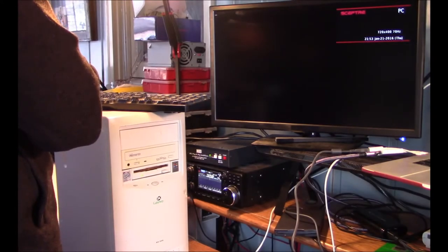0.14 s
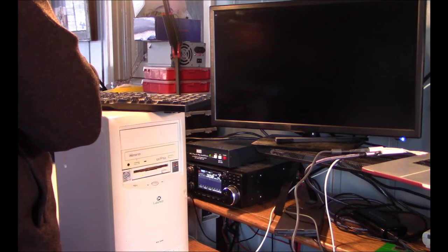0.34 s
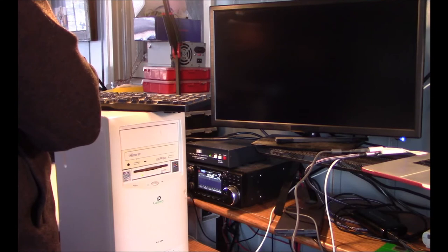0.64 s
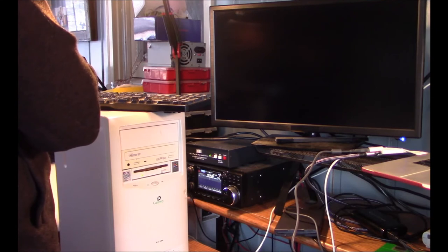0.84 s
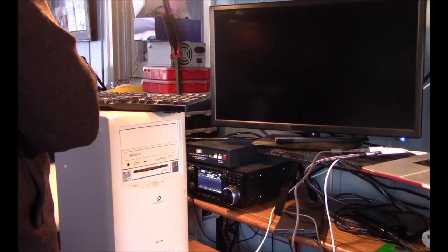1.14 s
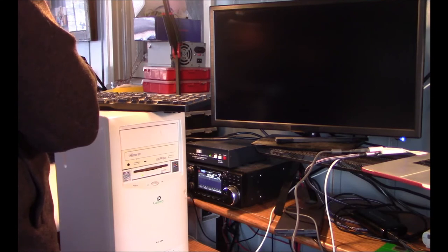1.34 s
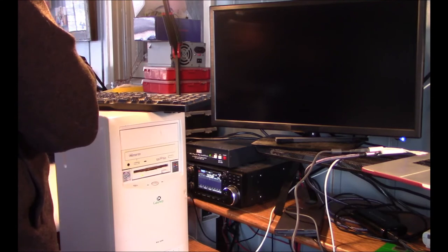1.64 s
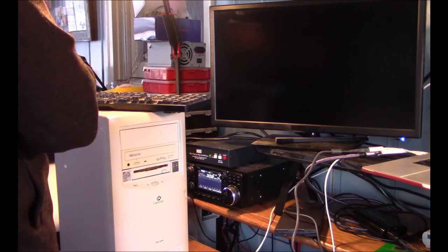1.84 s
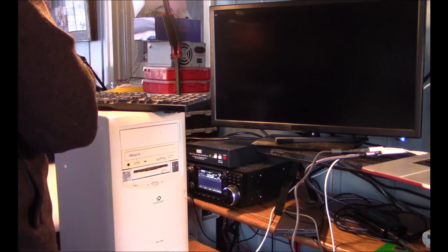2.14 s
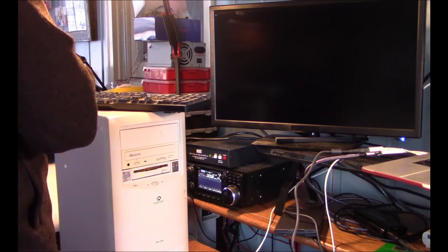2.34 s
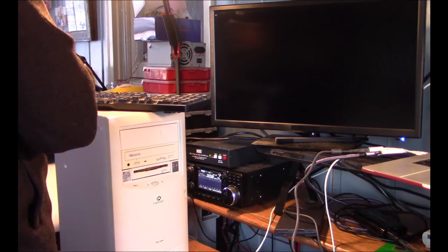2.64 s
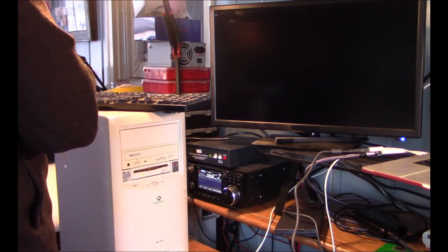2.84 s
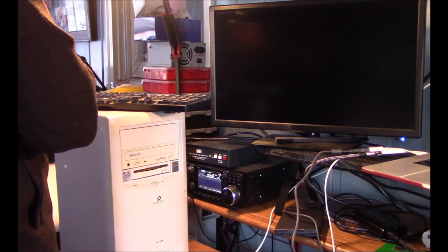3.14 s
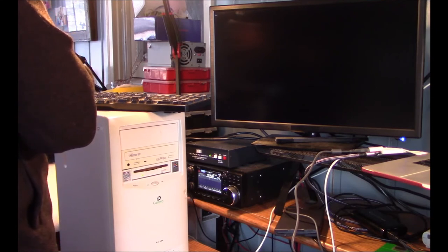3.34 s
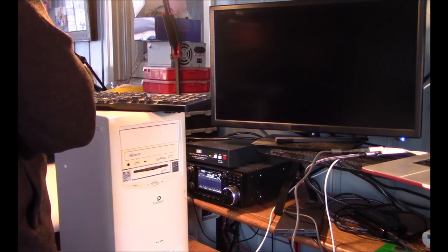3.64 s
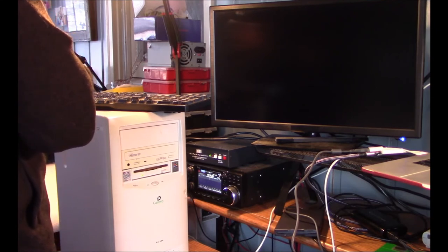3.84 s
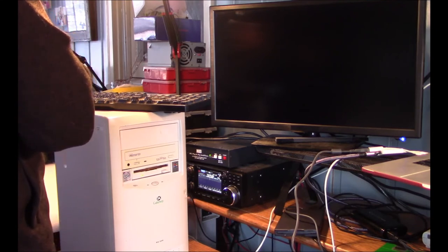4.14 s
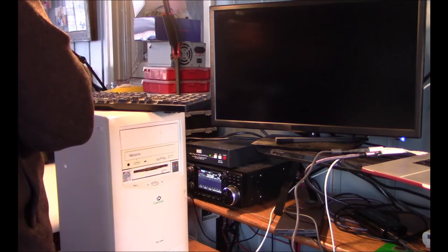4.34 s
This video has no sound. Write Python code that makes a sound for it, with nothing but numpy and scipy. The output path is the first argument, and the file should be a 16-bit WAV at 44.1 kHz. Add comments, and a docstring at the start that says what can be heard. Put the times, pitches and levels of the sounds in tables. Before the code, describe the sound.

A floppy disk spins inside a desktop computer and rubs once each turn, making a dry, hissy scraping swish about five times a second. Each swish is nearly identical, with a thin metallic ring, tiny squeaks and a faint whistle. The rhythm holds evenly throughout, over a soft bed of fan air, case rumble and electrical hum. The drive sounds centered and fairly near, in a small room with a short reverb.

```python
"""A small room with a desktop computer, its floppy disk spinning at 300 rpm. Once a turn the slightly
warped disk rubs on its liner: the same patch passes each time, so every swish has nearly the same grain,
the same small squeaks and the same faint whistle. The drive's sheet metal colours the rubbing.
Underneath runs a bed of fan air, case rumble and mains hum."""
import sys
import numpy as np
from scipy import signal
from scipy.fft import rfft, irfft, next_fast_len
from scipy.io import wavfile
from scipy.ndimage import map_coordinates

SR = 44100
rng = np.random.default_rng(int(sys.argv[2]) if len(sys.argv) > 2 else 0)


def to_wav(s):
    """Save 16-bit WAV."""
    ch = np.atleast_2d(s).T  # columns
    pcm = np.round(np.clip(ch, -1, 1) * 32767)  # PCM
    wavfile.write(sys.argv[1], SR, pcm.astype(np.int16))


N = 198109

TURN_S, FIRST_TOUCH_S = .199909, -.0028
CREST_S = 0.0785  # the warp presses hardest this long after it touches


def disk(turns=23, rub_db=-40.5, settle_db=0.5):
    """The warp brushes the liner: one swish a turn, the first few a little stronger."""
    rubs = amp(rub_db) * rubbing(turns)
    t = np.arange(rubs.shape[1]) / SR
    swishes = rubs + squeaks(t) + whistle(t)
    track = np.zeros(N + 2 * SR)  # a second spare at each end
    for turn, swish in enumerate(swishes):
        start = SR + round((FIRST_TOUCH_S + turn * TURN_S) * SR)
        track[start:start + len(swish)] += amp(settle_db * np.exp(-turn / 4)) * swish
    return track[SR:SR + N]


def rubbing(turns, drag_hz=1250, hiss_hz=4700):
    """Friction in three bands rings the frame: each pass opens as bright hiss and closes as dull drag."""
    rough = surface(turns)
    t = np.arange(rough.shape[1]) / SR
    low = filtered(rough, lambda hz: 1 / (1 + (hz / drag_hz) ** 12))
    body = filtered(rough, lambda hz: 1 / (1 + (hz / hiss_hz) ** 12))
    drag = low * contact(t, crest_db=3.93, swell=67, release_at_s=0.1173, release=620)
    scrape = (body - low) * contact(t, crest_db=0.35, swell=29, release_at_s=0.12, release=450)
    hiss = (rough - body) * contact(t, crest_db=0.72, swell=26, release_at_s=0.091, release=436)
    flare = amp(5 * bump(t, CREST_S, length_s=0.01))  # a flick of extra hiss on the crest
    return signal.fftconvolve(drag + scrape + hiss * flare, frame_ring()[None], axes=1)


def surface(turns, size=6000):
    """Grain of the rubbing patch, one row a turn; the finest detail drifts as the disk settles."""
    hz = np.fft.rfftfreq(size, 1 / SR)
    grain = rng.uniform(0, 2 * np.pi, len(hz))
    creep = .04 * hz / 6000 * rng.standard_normal(len(hz))  # radians a turn
    loose_dust = amp(-17) * rng.standard_normal((turns, size))
    phase = grain + np.arange(turns)[:, None] * creep
    return unit(irfft(np.exp(1j * phase))) + loose_dust


def contact(t, crest_db, swell, release_at_s, release, ease=16, attack_s=0.0039):
    """Envelope of one pass: a quick attack, then swell, ease and release slopes in dB per second."""
    attack_db = 9 * np.maximum(1 - t / attack_s, 0)
    slack_db = swell * np.maximum(CREST_S - t, 0) + ease * np.maximum(t - CREST_S, 0)
    release_db = release * np.maximum(t - release_at_s, 0)
    return amp(crest_db - attack_db - slack_db - release_db)


# Broad tone of the friction: (frequency [Hz], relative level [dB])
FRICTION_EQ = [(300, -28.5), (850, -17), (1250, -18.5), (1700, -10.5), (2400, -7.5), (2800, -6),
               (3500, -12.5), (4500, -10.5), (5200, -5.5), (7300, -15.5), (11900, -12.5), (12300, -23),
               (13600, -12), (15200, -28)]
# Resonances of the drive frame and disk shell: (frequency [Hz], width [Hz], level over broad tone [dB])
FRAME_MODES = [(1004.3, 31.5, 18), (1518, 126, 9.5), (1858, 97, 3.5), (2048, 24, 14), (2410, 11, -21),
               (2730, 30, 8), (2776, 25, 18), (2948, 18, 17.5), (3160, 103, 15), (3593, 17, 16),
               (3892, 140, 9.5), (4147, 24.6, 19.5), (4280, 72, 12), (4550, 56, -18), (4915, 63, 16.5),
               (4862, 17.5, 12.5), (5260, 34, 14), (5224, 36, 14), (6270, 120, 12.5), (5945, 210, 13.5),
               (6450, 35, 17), (6650, 115, 15), (6940, 61, 21), (7260, 35, 18), (7750, 34, 16),
               (8250, 23, 16.5), (8760, 390, 7), (9810, 360, 3), (11250, 41, 9.5), (12070, 79, 11)]


def frame_ring(size=8192):
    """The drive's metallic colour as an impulse response: narrow resonances on a broad tone."""
    hz = np.fft.rfftfreq(size, 1 / SR)
    peaks = sum(amp(db) ** 2 / (1 + (2 * (hz - centre) / width) ** 2)
                for centre, width, db in FRAME_MODES)
    magnitude = amp(along(FRICTION_EQ, hz)) * np.sqrt(1 + peaks)
    cepstrum = irfft(np.log(magnitude))
    cepstrum[1:size // 2] *= 2  # fold to minimum phase: no ring before the touch
    cepstrum[size // 2 + 1:] = 0
    ring = irfft(np.exp(rfft(cepstrum)))
    return ring / np.linalg.norm(ring)


# Spots where the disk catches: (time after touch [s], pitch [Hz], level [dB], length [s])
SQUEAK_SPOTS = [(.0065, 2885, -38, 0.016), (0.024, 1818, -47.5, 0.017), (0.033, 2890, -47.5, 0.03),
                (0.036, 5323, -44, 0.012), (0.049, 2900, -53, 0.0073), (0.07, 2672, -41, 0.035),
                (0.075, 7070, -41, 0.021), (0.095, 4900, -37.5, 0.006), (0.116, 2965, -38.5, 0.015)]


def squeaks(t):
    """Stick-slip gives a tiny sine blip at each catching spot."""
    return sum(amp(db) * bump(t, at_s, length_s) * np.sin(2 * np.pi * (hz * t + rng.random()))
               for at_s, hz, db, length_s in SQUEAK_SPOTS)


def whistle(t, level_db=-50, top_hz=5404, top_s=.06, bend_hz_per_s2=420000, width_hz=230):
    """The rubbing patch sings: a narrow band of friction noise makes one arch of pitch as it passes."""
    start_s, end_s, fade_s = 0.023, 0.126, .018
    knots = rng.standard_normal((2, 400))
    sway = unit(np.array([map_coordinates(row, [t * width_hz]) for row in knots]))
    hz = top_hz - bend_hz_per_s2 * (np.minimum(t, end_s) - top_s) ** 2
    phase = 2 * np.pi * np.cumsum(hz) / SR
    gate = np.clip(np.minimum(t - start_s, end_s - t) / fade_s, 0, 1)
    return amp(level_db) * gate * (sway[0] * np.cos(phase) + sway[1] * np.sin(phase))


# Decay of the room: (frequency [Hz], time to fall 60 dB [s])
ROOM_DECAY = [(300, 0.77), (3000, 0.22), (6000, 0.16), (12000, 0.19)]
# Stereo spread, almost mono with slight width around 4-6 kHz: (frequency [Hz], side over mid [dB])
STEREO_SPREAD = [(1000, -26), (2000, -58), (3000, -58), (4200, -15.5), (5800, -12), (7500, -29),
                 (13000, -77)]


def room(x, wet_db=-4.5, build_s=0.0027):
    """Close walls answer with a short reverb that lingers longest in the lows."""
    hz, t, noise = signal.stft(rng.standard_normal((2, SR // 2)), SR, nperseg=256)
    decay = amp(-60 * t / along(ROOM_DECAY, hz)[:, None])
    tail = signal.istft(noise * decay, SR)[1]
    tail *= 1 - np.exp(-np.arange(tail.shape[1]) / SR / build_s)  # reflections build up
    mid, side = signal.fftconvolve(x[None], tail / np.linalg.norm(tail[0]), axes=1)[:, :N]
    side = filtered(side, lambda hz: amp(along(STEREO_SPREAD, hz)))
    return amp(wet_db) * np.array([mid + side, mid - side])


# Rush of the fans: (frequency [Hz], relative level [dB])
FAN_EQ = [(410, -29), (700, -1.5), (1000, -6), (1300, -4), (1950, -14), (2590, 0), (3030, -4), (5500, -5.5),
          (8000, -14.5), (15500, -33.5)]
# Rumble of air in the case: (frequency [Hz], relative level [dB])
RUMBLE_EQ = [(20, -24), (45, -28), (80, -8.5), (140, -1), (220, 2), (320, 3.5), (480, 0.5), (750, -7),
             (1000, -29), (1500, -22), (3000, -60)]


def fans(rush_db=-57, rumble_db=-63.3, rise_db_per_s=0.5):
    """Fans push air through the case: a steady rush, and a rumble that grows as the flow picks up."""
    t = np.arange(N) / SR
    return amp(rush_db) * air(FAN_EQ) + amp(rumble_db + rise_db_per_s * t) * air(RUMBLE_EQ)


# Stereo image of the moving air: (frequency [Hz], left-right correlation [0 to 1])
AIR_IMAGE = [(30, .35), (70, 0.47), (250, 0.71), (500, 0.42), (1000, 0.92), (4000, 0.96)]


def air(eq):
    """Steady airflow noise at rms 1, wide in the lows and narrow in the highs."""
    def mid_side_gains(hz):
        angle = np.arccos(np.clip(along(AIR_IMAGE, hz), -1, 1)) / 2
        return amp(along(eq, hz)) * [np.cos(angle), np.sin(angle)]

    mid, side = filtered(rng.standard_normal((2, N)), mid_side_gains)
    return unit(np.array([mid + side, mid - side]))


# Mains harmonics and fan tones: (frequency [Hz], rms level [dB])
HUM_TONES = [(60, -87.5), (120, -74.5), (180, -74.5), (240, -68.5), (300, -71.5), (360, -72), (480, -79.5),
             (605, -78), (684, -80)]


def hum(waver_db=1, waver_hz=1.97):
    """Mains and fans drone faintly, each tone wavering in level on its own."""
    t = np.arange(N) / SR
    drone = np.zeros(N)
    for hz, db in HUM_TONES:
        gain = np.sqrt(2) * amp(db + waver_db * wobble(waver_hz))
        drone += gain * np.sin(2 * np.pi * (hz * t + rng.random()))
    return drone


def amp(db):
    """Decibels to gain."""
    return 10 ** (np.asarray(db) / 20)


def unit(x):
    """Scaled to rms 1."""
    return x / np.sqrt(np.mean(x ** 2) + 1e-20)


def along(points, hz):
    """A curve through (frequency [Hz], value) points on a log frequency axis."""
    freqs, values = np.transpose(points)
    return np.interp(np.log(hz + 1), np.log(freqs + 1), values)


def bump(t, centre_s, length_s):
    """A smooth fade from 0 to 1 and back."""
    return np.cos(np.pi * np.clip((t - centre_s) / length_s, -.5, .5)) ** 2


def wobble(rate):
    """Smooth random modulation, rate knots a second."""
    knots = rng.standard_normal(int(N * rate / SR) + 4)
    return map_coordinates(knots, [np.arange(N) * rate / SR])


def filtered(x, response):
    """Zero-phase EQ with a gain of response(hz)."""
    size = next_fast_len(x.shape[-1] + SR // 10)
    hz = np.fft.rfftfreq(size, 1 / SR)
    return irfft(rfft(x, size) * response(hz), size)[..., :x.shape[-1]]


def scene():
    """The drive dead centre with its reverb, over the bed of hum and fans."""
    drive = disk()
    return drive + room(drive) + hum() + fans()


def record(dry):
    """A brick-wall low-pass trims the very top."""
    top_hz = 15650
    return filtered(dry, lambda hz: hz < top_hz)


dry = scene()
out = record(dry)
to_wav(out)
```